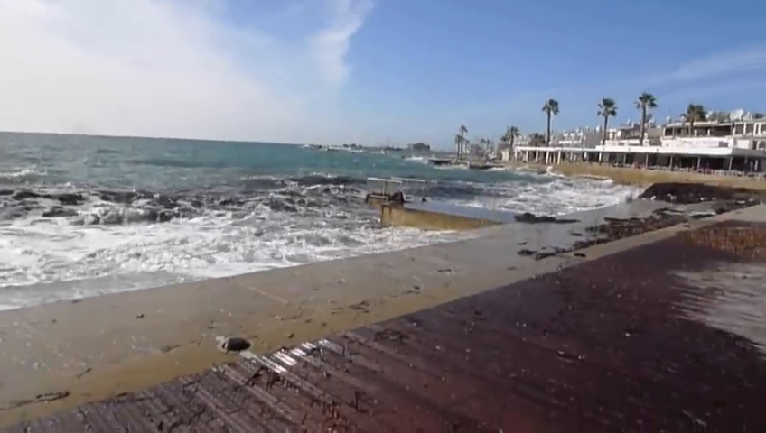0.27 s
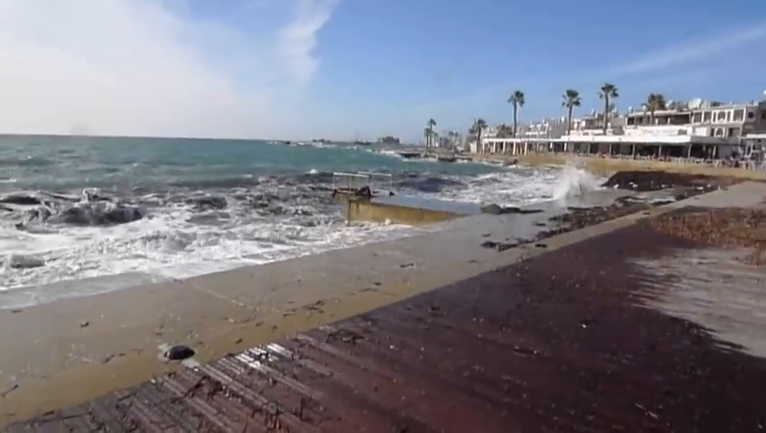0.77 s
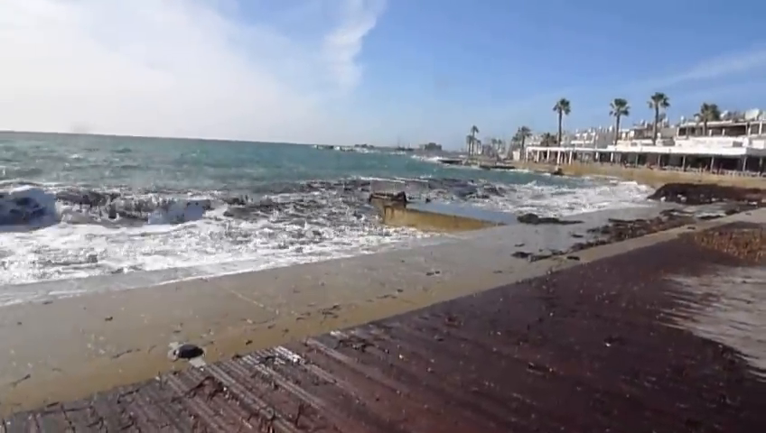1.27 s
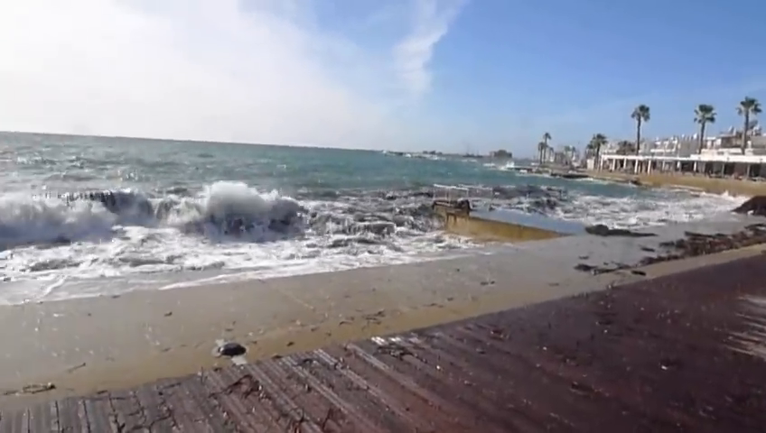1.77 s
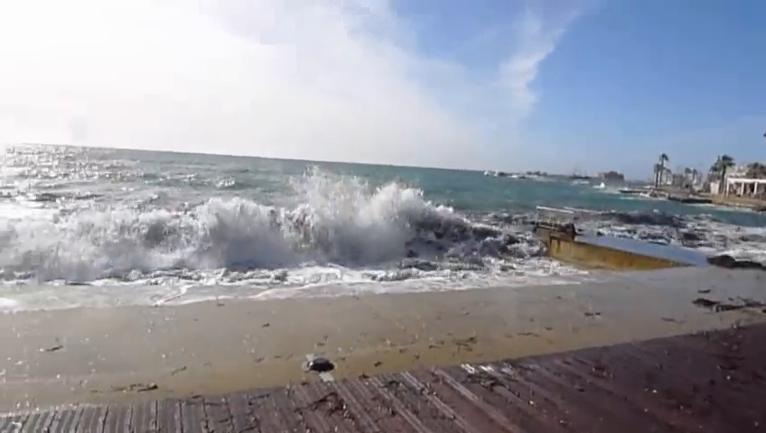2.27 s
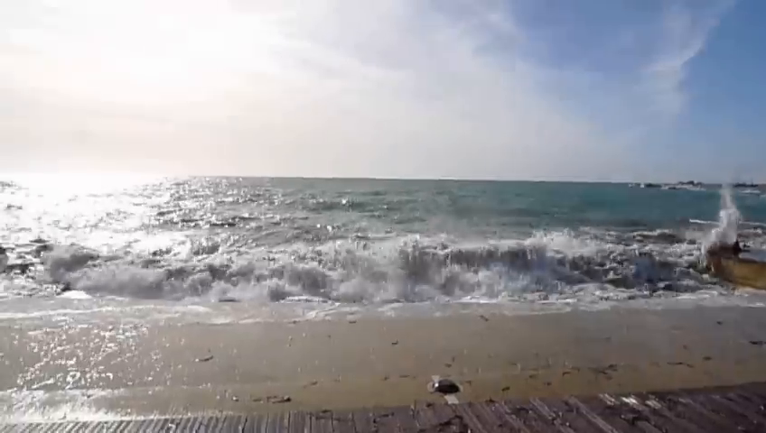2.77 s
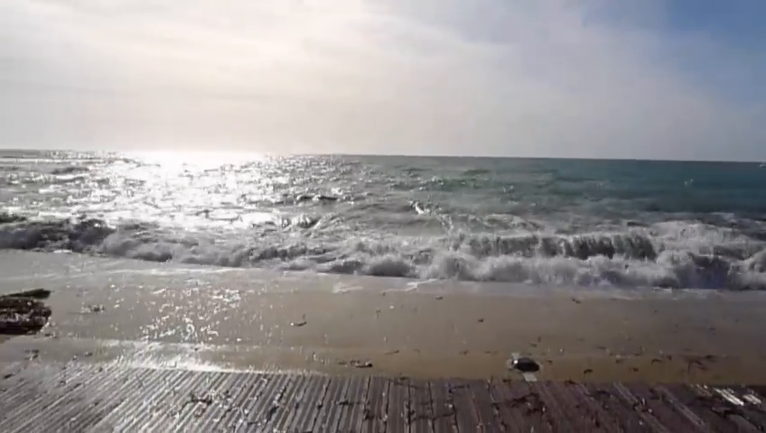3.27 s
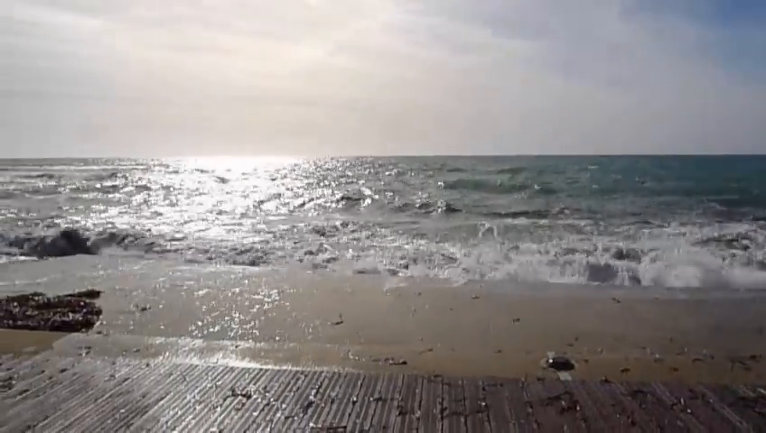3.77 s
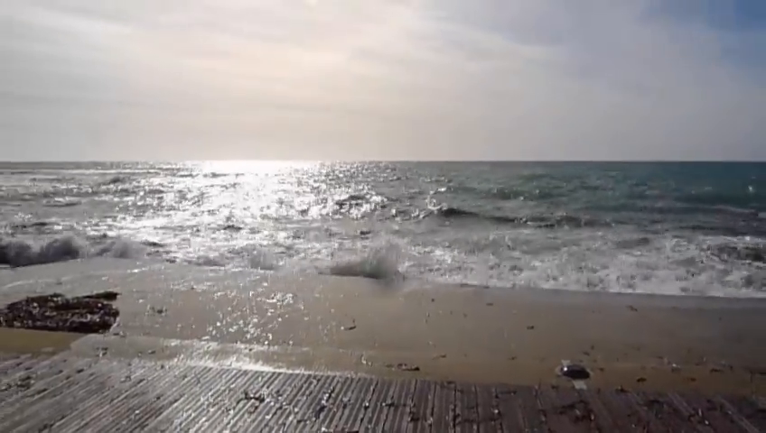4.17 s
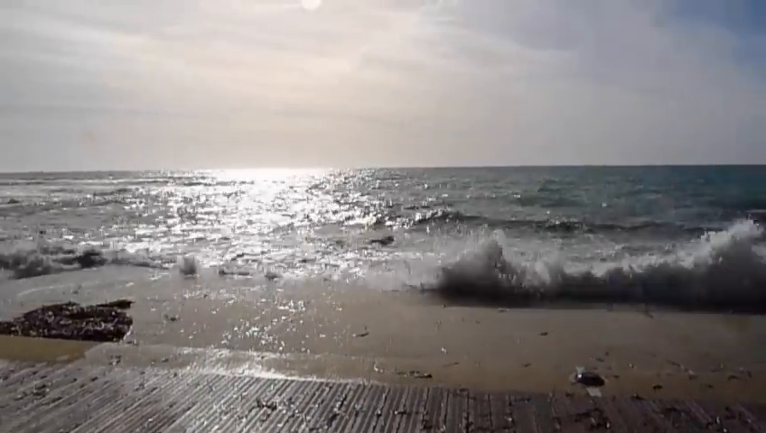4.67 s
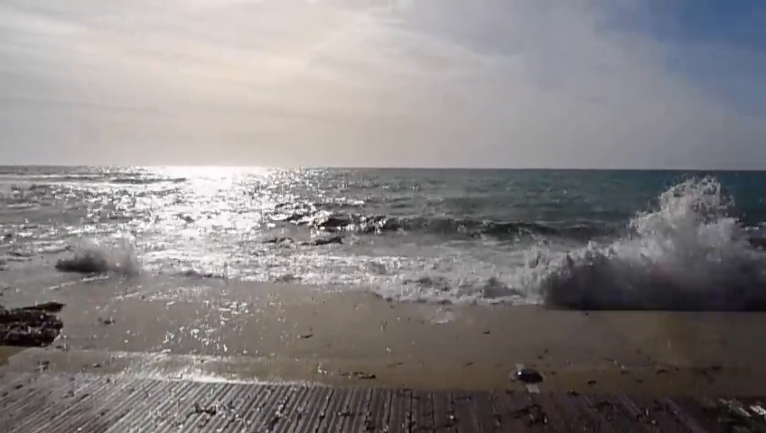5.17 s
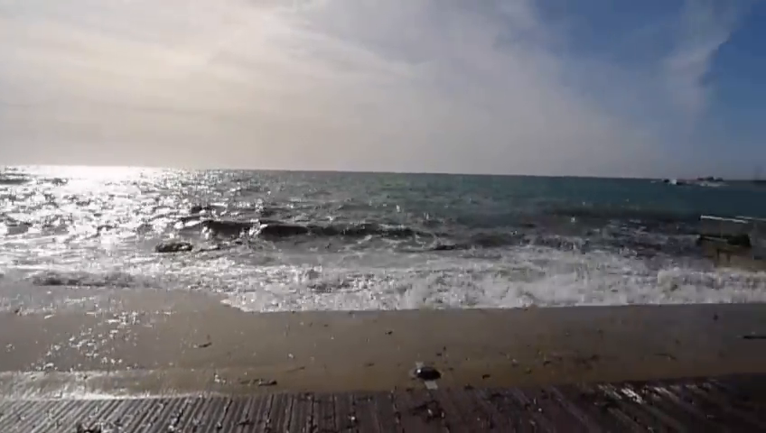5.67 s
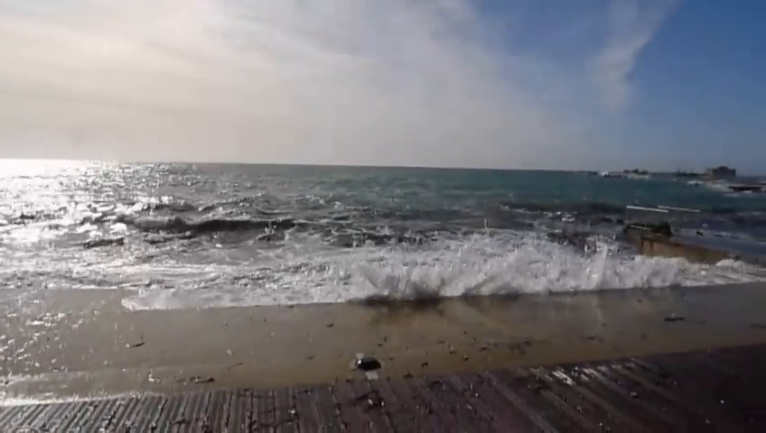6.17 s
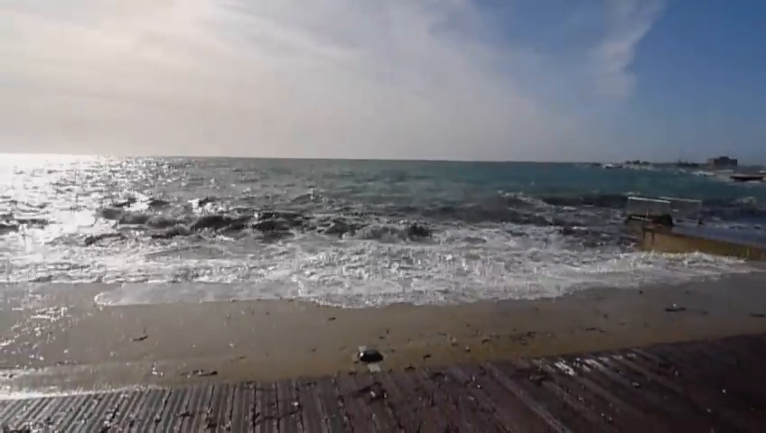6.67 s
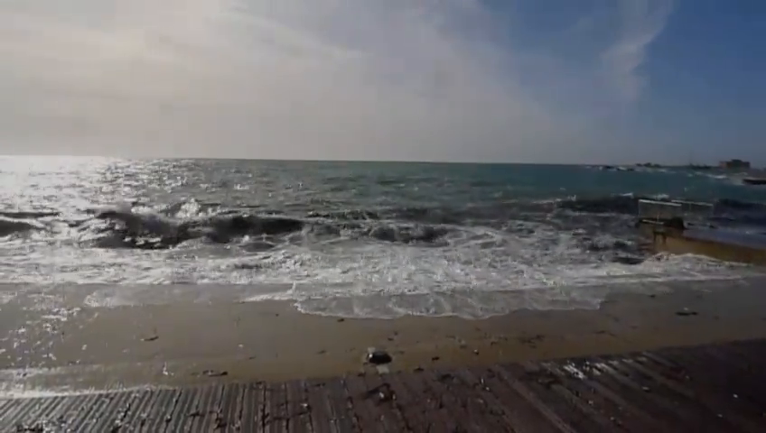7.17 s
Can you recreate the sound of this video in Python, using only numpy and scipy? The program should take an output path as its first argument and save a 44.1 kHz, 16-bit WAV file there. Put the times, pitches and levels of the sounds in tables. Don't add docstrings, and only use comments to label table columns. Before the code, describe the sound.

Gusty wind rumbles and thuds on a small camera microphone while rough sea foam hisses and breaks on wet concrete, later gurgling and popping.

```python
import sys
import numpy as np
from scipy import signal
from scipy.io import wavfile
from scipy.ndimage import uniform_filter1d

SR = 44100
rng = np.random.default_rng(int(sys.argv[2]) if len(sys.argv) > 2 else 0)


def put_to_file(sound):
    columns = np.atleast_2d(sound).T
    safe = np.clip(columns, -1, 1)
    whole_steps = np.round(safe * 32767)
    wavfile.write(sys.argv[1], SR, whole_steps.astype(np.int16))


def field_ratio(decibels):
    return 10 ** (np.asarray(decibels, dtype=float) / 20)


N = 327037
MIRROR_HZ = 765

# [t/s, peak/dB, f/Hz]
EARLY_SUCKS = [(0.018, -12, 137), (0.0615, -13, 208), (0.077, -12.9, 172), (0.1016, -10, 218),
               (0.1278, -8.5, 143), (0.169, -13, 232), (0.1933, -10.5, 183), (0.211, -9, 168),
               (0.236, -11, 242), (0.255, -23, 125), (0.2693, -7.5, 180), (0.5106, -8.5, 174),
               (0.6135, -11, 177), (0.626, -7, 128), (0.6446, -19, 110), (0.6617, -10.5, 229),
               (0.7563, -17, 113), (0.7684, -16, 110), (0.79, -11, 179), (0.8703, -15, 191),
               (0.887, -9.5, 183), (0.916, -10, 120), (0.9457, -7.5, 306), (1.0363, -9, 119),
               (1.073, -8, 160), (1.2529, -16, 165), (1.261, -5.5, 190), (1.2976, -21, 110),
               (1.306, -8, 158), (1.3346, -13, 202), (1.3668, -11, 180), (1.388, -9.5, 139),
               (1.5362, -11, 217), (1.5452, -17, 262), (1.6464, -12, 234), (1.665, -14, 306),
               (1.676, -4, 272), (1.694, -11, 400), (1.707, -14, 123), (1.7313, -10, 159),
               (1.806, -10.5, 234), (1.8357, -6.5, 276), (1.851, -8.5, 382), (1.9005, -9, 182),
               (1.92, -7, 290), (1.9333, -7.5, 350), (1.955, -20, 110), (1.9988, -16, 147),
               (2.018, -11.5, 198), (2.0399, -5, 226), (2.1, -10, 163), (2.108, -11, 190),
               (2.1238, -7, 286), (2.1681, -8, 236), (2.2263, -10.5, 328), (2.247, -11, 204),
               (2.2585, -9, 256), (2.275, -11, 204)]
# [t/s, peak/dB, f/Hz]
LATE_SUCKS = [(2.318, -9.5, 276), (2.3352, -8, 252), (2.389, -8.5, 188), (2.416, -12, 185),
              (2.445, -10.5, 265), (2.4635, -14.0, 279), (2.4766, -7, 232), (2.511, -12.5, 285),
              (2.5657, -10, 226), (2.593, -5.5, 200), (3.2177, -10.5, 277), (3.2552, -10, 201),
              (3.3104, -14.5, 284), (3.3253, -9.5, 183), (3.4231, -13, 235), (3.5251, -9, 170),
              (3.5415, -11, 272), (3.5513, -8.5, 282), (3.5632, -13, 334), (3.575, -16, 142),
              (3.6116, -9, 260), (3.64, -10, 244), (3.6991, -11.5, 250), (3.7597, -12.5, 148),
              (3.7727, -4.5, 280), (3.7945, -12, 237), (3.8142, -11, 212), (3.8369, -6, 256),
              (3.875, -11, 206), (4.2539, -10, 283), (4.3314, -10.5, 329), (4.3701, -13, 229),
              (4.4252, -10, 222), (4.4473, -16, 268), (4.4901, -13, 420), (4.501, -22, 136),
              (4.509, -14, 154), (4.5285, -8.5, 282), (4.5515, -12, 254), (4.615, -11, 316),
              (4.708, -16, 329), (4.9988, -13, 344), (5.0177, -17, 259), (5.0375, -17, 324),
              (5.271, -15, 270), (5.2883, -10, 229), (5.8911, -14, 242), (6.0256, -16, 175),
              (6.3203, -13, 264), (6.335, -17, 390), (6.367, -14, 265), (6.4288, -19, 290),
              (6.6836, -12.5, 206), (6.8157, -9, 151), (6.8248, -13, 149), (6.8342, -10, 176),
              (6.8422, -9.5, 133), (7.1143, -18.5, 147)]
# [t/s, peak/dB, f/Hz]
SMALL_SUCKS = [(0.0544, -16, 239), (0.3577, -17, 200), (.8367, -11, 119), (0.9396, -14, 400),
               (1.2583, -14, 210), (1.4777, -12, 170), (1.5112, -15, 220), (1.749, -16, 241),
               (1.9716, -13, 201), (2.148, -18, 220), (2.373, -15, 230), (2.645, -15, 400),
               (2.686, -16, 240), (3.1382, -17, 230), (3.3765, -14, 220), (3.438, -12, 230),
               (3.8826, -23, 300), (3.9024, -16, 330), (4.1299, -17, 300), (4.4648, -13, 230),
               (4.575, -16, 250), (4.914, -17, 238), (5.2539, -15, 242), (6.7755, -15, 221),
               (6.8518, -15, 150), (6.8916, -18, 220), (7.0961, -14.5, 200), (7.2345, -23, 327),
               (7.283, -16, 240), (7.3443, -15.5, 260)]
# [t/s, peak/dB, f/Hz]
STRONG_PUSHES = [(.079, -17, 201), (.463, -15, 200), (0.581, -13, 170), (1.22, -13.5, 170),
                 (1.681, -10.5, 400), (1.690, -11, 398), (1.711, -9.5, 262), (1.88, -15, 260),
                 (1.896, -11, 340), (2.08, -15, 298), (2.191, -11, 220), (2.237, -15, 217),
                 (2.402, -16, 300), (2.504, -16, 273), (3.341, -13, 220), (3.512, -14, 280),
                 (3.622, -8, 226), (4.198, -13, 330), (4.869, -12.5, 192)]
# [t/s, peak/dB, f/Hz]
MORE_PUSHES = [(0.0525, -20, 272.0), (0.1885, -12, 187.0), (0.2495, -14, 186.0), (0.2585, -11.5, 191.0),
               (0.5543, -17, 191.0), (0.7167, -12, 169.0), (0.7248, -14.0, 147), (0.7339, -10.5, 211.0),
               (0.881, -12.5, 110.0), (0.9347, -16, 232), (1.135, -14, 250.0), (1.292, -14, 186.0),
               (1.3018, -5.5, 204.0), (1.426, -11.5, 141.0), (1.4737, -18, 172.0), (1.6567, -15, 170.0),
               (1.6726, -8, 307.0), (1.995, -16, 140.0), (2.2054, -15, 195.0), (2.254, -10, 225),
               (2.3978, -9, 172), (2.4562, -14.0, 193.0), (2.4645, -11, 202.0), (3.2452, -11.5, 220.0),
               (3.3915, -19, 186.0), (3.403, -11, 260.0), (4.2422, -18, 218), (4.3269, -13, 187),
               (4.3935, -12, 218.0), (4.4743, -14, 213.0), (4.5003, -10, 206.0), (4.5471, -21, 142),
               (4.726, -12, 247.0), (4.8086, -13, 250.0), (5.0095, -11, 293.0), (5.04, -22, 247.0),
               (5.0703, -15, 208.0), (5.2748, -13, 213.0), (5.3186, -13, 220.0), (5.7939, -12, 210),
               (5.9926, -14, 231.0)]
# [t/s, level/dB, upper-middle hiss from facing the sea/dB, fineness of foam/dB]
SURF_COURSE = [(0.0, -36.5, -10.5, 0), (0.31, -33.5, -12.5, -1), (0.76, -29.5, -11.5, -0.5),
               (0.93, -28.5, -14.5, -2.5), (1.0, -34, -10, -0.5), (1.3, -30, -14, -1),
               (1.67, -29, -14.5, -2), (1.73, -34.5, -11.5, -1), (2.13, -34.5, -14.5, 1.5),
               (2.35, -30, -15, 0), (2.73, -36, -7.5, 2.5), (3.24, -28.5, -8.5, 0), (3.9, -32.5, -7.5, -.5),
               (4.27, -28, -8.5, -0.5), (5.14, -27.5, -5.5, 2), (5.9, -30.5, -10, -0.4), (6.45, -28, -7, 1),
               (7.17, -32, -10, 0)]
# [t/s, extra level/dB, length/s, extra weight of water/dB]
SLAB_HITS = [(0.91, -19, 0.027, -2), (1.54, -16, 0.038, 2), (1.662, -7, 0.024, 0), (3.25, -22, 0.041, 0.5),
             (3.316, -2, 0.012, -11), (3.538, -9.5, 0.054, -0.5), (4.24, -23, 0.014, 3),
             (5.275, -14, 0.0081, 2), (5.605, -36, 0.049, 1), (6.352, -7.5, 0.035, 2.5),
             (1.6, -17, .08, -2.5), (3.28, -21, .09, -2), (6.43, -17, 0.21, -1), (4.85, -14, 0.017, -5),
             (6.22, -16, 0.0205, -3), (6.744, -19, 0.079, 2), (7.38, -8, 0.088, -1.5)]


def evened(x):
    return x / np.sqrt(np.mean(x ** 2) + 1e-20)


def column(rows, t, count):
    rows = np.asarray(rows, float)
    return np.interp(t, rows[:, 0], rows[:, count])


def drift(shape, size):
    z = rng.standard_normal(shape)
    for axis, n in enumerate(size):
        z = uniform_filter1d(uniform_filter1d(z, n, axis), n, axis)
    return evened(z)


def noise(field_db, size):
    a, b = np.moveaxis(rng.standard_normal(field_db.shape + (2,)), -1, 0)
    spectrum = (a + 1j * b) * field_ratio(field_db)
    return signal.istft(spectrum.T, nperseg=size, noverlap=size * 3 // 4)[1][:N]


def grid(size):
    frame_s = np.arange(4 * N // size + 6)[:, None] * size / 4 / SR
    return frame_s, np.fft.rfftfreq(size, 1 / SR)[None]


def colour(points, hz):
    f, db = np.transpose(points)
    return np.interp(np.log(hz + 1), np.log(f + 1), db, left=-120, right=-120)


def eddy(hz, cycles):
    u = np.arange(1500) / SR * hz
    vent = signal.butter(2, 0.38 * hz, "high", fs=SR)
    pulse = signal.lfilter(*vent, np.sin(2 * np.pi * u) * u * np.exp(-u / cycles))
    return pulse / abs(pulse).max()


def thumps(cycles=0.35, db=0.5, higher=1.037):
    # [t/s, peak/dB, f/Hz]
    last_sucks = [
        (7.4028, -28, 230),
        (7.408, -16.5, 251),
        (7.4152, -18, 217),
    ]
    sucks = EARLY_SUCKS + LATE_SUCKS + SMALL_SUCKS + last_sucks
    out = np.zeros(N + 1500)
    for gain, rows in ((0.91, sucks), (-0.94, STRONG_PUSHES + MORE_PUSHES)):
        for s, peak_db, hz in rows:
            pulse = eddy(higher * hz, cycles)
            start = round(s * SR) - pulse.argmin()
            out[start:][:1500] += gain * field_ratio(peak_db + db) * pulse
    return out[:N]


def buffet(level, pitch, per_s, db, spread_db=2.0, clump_db=1.0, cycles=0.59, scatter=.28, suction=.75):
    t, out = np.arange(N) / SR, np.zeros(N)
    pitches = np.geomspace(80, 700, num=16)
    which = np.searchsorted(pitches, pitch * np.exp(scatter * rng.standard_normal(N)))
    knots = N // 100 + 2
    clumps = np.interp(t, np.arange(knots) * 100 / SR, drift((knots,), size=(9,)))
    size = field_ratio(spread_db * np.minimum(rng.exponential(1, N), 3) + clump_db * clumps)
    size = size * (rng.random(N) < per_s / SR)
    size = size * np.where(rng.random(N) < suction, 1, -1)
    for k, hz in enumerate(pitches):
        out += signal.oaconvolve(size * (which == k), eddy(hz, cycles))[:N]
    return out / np.sqrt(uniform_filter1d(out ** 2, size=3000) + 1e-9) * field_ratio(level + db)


def lull(depth=0.88, width_s=0.0053):
    t = np.arange(N) / SR
    strong = EARLY_SUCKS + LATE_SUCKS + STRONG_PUSHES + MORE_PUSHES + SMALL_SUCKS
    near_s = np.min(abs(t[::64, None] - np.transpose(strong)[0]), axis=1)
    return 1 - depth * np.exp(-(np.interp(t, t[::64], near_s) / width_s) ** 2)


def rumble(level, lumpy_db=4.0, lean=0.4):
    # [f/Hz, density/dB per Hz]
    rumble_spectrum = [(15, -36.5), (30, -23.5), (50, -4.5), (66, 2), (82, 1), (110, -3.5), (160, -8.5),
                       (260, -24.5)]
    # [t/s, level/dB, length/s]
    leans = [(0.108, -3, 0.023), (0.208, -3, 0.031), (0.374, -5, 0.03), (0.831, 6, 0.066),
             (0.996, -3, 0.088), (1.072, -5, 0.014), (1.285, 0, 0.08), (1.366, -1, 0.044),
             (1.492, 2, 0.042), (1.682, 2, 0.08), (1.805, -4.5, 0.08), (2.105, 0, 0.08), (2.196, -2, 0.027),
             (2.31, -15, 0.073), (2.393, 11, 0.09), (2.563, -10, 0.064), (2.782, 0, 0.036),
             (2.92, 3, 0.045), (3.004, -2, 0.025), (3.076, -2, 0.037), (3.205, -3, 0.023),
             (3.273, 10, 0.08), (3.472, -1, 0.078), (3.617, 3, 0.08), (3.688, -2, 0.034), (3.763, 3, 0.054),
             (3.949, -3, 0.021), (4.044, -6, 0.087), (4.216, -3, 0.035), (4.353, 6, 0.08),
             (4.551, -1, 0.037), (5.154, -8, 0.08), (5.335, -3, 0.023), (5.4, 1, 0.045), (5.483, -7, 0.08),
             (5.703, 6, 0.072), (5.824, -6, 0.036), (6.039, -6, 0.03), (6.352, -3, 0.032),
             (6.538, -6, 0.08), (6.725, -6, 0.032), (6.823, 12, 0.067), (6.92, -2, 0.01),
             (7.032, -3, 0.063), (7.282, 0, 0.061)]
    t, hz = grid(size=2048)
    lumps = lumpy_db * drift((len(t), 1), size=(2,))
    raw = noise(colour(rumble_spectrum, hz) + lumps, size=2048)
    power = uniform_filter1d(uniform_filter1d(raw ** 2, size=2400), size=2400)
    steady = raw / np.sqrt(power + 1e-12)
    s, heave_db, length = np.transpose(leans)[:, :, None]
    u = np.arange(0, N, 64) / SR
    bumps = (heave_db * np.exp(-((u - s) / length) ** 2)).sum(0)
    heave = np.interp(np.arange(N) / SR, u, bumps)
    return steady * field_ratio(level + lean * heave)


def air(t):
    # [t/s, strength/dB, weight of large slow gusts/dB, share of small quick eddies/dB]
    wind_course = [(0.0, -21.5, -8, -4), (0.35, -27.5, -2, -6.5), (0.75, -23.5, 2, -3.5),
                   (1.2, -27.5, 3, -2.5), (1.6, -28.5, 3.5, -1.5), (1.8, -19, -6.5, -3.5),
                   (2.45, -22.5, -8, -7.5), (2.65, -29, -10.5, -8), (3.0, -29.5, -14.5, -5),
                   (3.3, -24.5, -13, -5.5), (3.8, -20, -12.5, -10), (3.97, -29, -14.5, -6),
                   (4.45, -23, -14.5, -7), (5.0, -27, -12.5, 0), (5.5, -27.5, -20, -6),
                   (6.2, -28, -8.5, -3), (6.7, -28, -8.5, -3), (7.42, -35, -4, -2)]
    # [t/s, level/dB, length/s, extra weight/dB]
    gust_bumps = [(.09, -2.5, 0.067, 0), (0.245, 5, 0.047, -1.5), (0.395, 2.5, 0.046, 4.5),
                  (.5, 1, 0.054, 4.5), (0.623, 2, 0.034, 0.5), (0.93, 3, 0.023, 2), (0.988, -10, 0.036, 7),
                  (1.047, 3, 0.018, -5), (1.273, 4, .04, -2.5), (1.695, 11.5, 0.052, -8.5),
                  (1.77, -8.5, 0.025, 6), (2.025, 2, 0.026, -4.5), (2.064, -5, 0.022, -2),
                  (2.137, 5, 0.036, -4.5), (2.247, 7, 0.024, 5), (2.58, -3, 0.017, 2), (3.31, -1, 0.02, 3),
                  (3.468, -1, 0.033, -0.5), (3.56, 8, 0.032, -1.5), (3.68, -4.5, 0.023, -0.5),
                  (3.798, 2, 0.05, -0.5), (3.917, 1.5, .05, -3), (4.133, 3.5, 0.045, -5.5),
                  (2.85, -2, 0.07, -3.5), (5.2, -0.5, 0.044, 2), (5.93, 1, .04, -1.5),
                  (6.154, -0.5, 0.05, -2.5), (6.56, -4, .05, -2.5), (4.52, 4, .05, 2), (4.748, 2, 0.028, 1),
                  (5.01, 7.5, 0.041, 4), (5.27, 8, 0.022, 0), (5.72, 2.5, 0.056, 4), (6.01, 5, 0.036, 0),
                  (6.37, -3, 0.054, 2), (6.646, -1, 0.069, 7), (6.829, 9.5, 0.028, 0.5),
                  (7.113, 8, 0.04, 1)]
    s, db, length, extra = np.transpose(gust_bumps)[:, :, None]
    bumps = np.exp(-((t - s) / length) ** 2)
    steady = column(wind_course, t, count=1)
    gust, heavy = (db * bumps).sum(0), (extra * bumps).sum(0)
    small = steady + column(wind_course, t, count=3) + 0.56 * gust - 0.064 * heavy
    return steady + gust, column(wind_course, t, count=2) + heavy, small


def wind():
    t = np.arange(N) / SR
    strength, weight, quick = (np.interp(t, t[::64], v) for v in air(t[::64]))
    large_hz = 195.45 * 2 ** (-0.02 * (weight + 5))
    large = buffet(strength, large_hz, per_s=400, db=-0.5)
    small = buffet(quick, 400., per_s=460, db=-3.5, cycles=0.71, scatter=.18)
    return (large + small) * lull() + rumble(strength + weight) * lull(depth=0.45) + thumps()


def slaps(t):
    hits = sum(field_ratio(db) * np.exp(-((t - s) / length) ** 2) for s, db, length, _ in SLAB_HITS)
    return 20 * np.log10(1 + hits)


def surf(crest=0.24, mirror=0.22, patchy_db=0.5, flicker_db=0.5, low_follow=0.44):
    # [f/Hz, density/dB per Hz]
    foam_spectrum = [(30, -32), (70, -25.5), (110, -13), (200, -2), (350, -3), (570, -13), (800, -9),
                     (1100, -11), (1800, -15), (2800, -17), (3500, -21), (3850, -31), (4200, -35.5),
                     (4700, -42.5), (5600, -49)]
    t, hz = grid(size=512)
    level, facing, bright = (column(SURF_COURSE, t, count=k) for k in (1, 2, 3))
    body = 0.45 * (facing + 6.5) - 0.16 * bright
    body = body + sum(db * np.exp(-((t - s) / length) ** 2) for s, _, length, db in SLAB_HITS)
    echo = mirror / (1 + (hz / 3500) ** 8) * np.exp(-2j * np.pi * hz / MIRROR_HZ)
    shape = colour(foam_spectrum, hz) + 20 * np.log10(abs(1 + echo))
    band = (hz[0] > 650) & (hz[0] < 1800)
    shape = shape - 10 * np.log10(np.sum(field_ratio(shape[0, band]) ** 2))
    upper = np.clip((hz - 2300) / 600, 0, 1) * (bright + 0.24)
    middle = np.exp(-((hz - 2330) / 380) ** 2) * (facing + 6.06)
    middle = middle + np.exp(-((hz - 830) / 280) ** 2) * (body + 0.13)
    swing = level - level.mean() + slaps(t)
    follow = low_follow + (1 - low_follow) * np.clip(hz / 600, 0, 1)
    follow = follow + crest * np.clip((hz - 3600) / 800, 0, 1)
    field = shape + upper + middle + level.mean() + follow * swing
    field = field + patchy_db * drift((len(t), hz.size), size=(14, 4))
    field = field + flicker_db * drift((len(t), 1), size=(5,))
    return field_ratio(2.0) * noise(field, size=512)


def spray(per_s=1500, spread_db=1.5, db=-10):
    out, t = np.zeros(N), np.arange(N) / SR
    which = rng.integers(0, 14, N)
    size = field_ratio(spread_db * np.minimum(rng.exponential(1, N), 4))
    size = size * (rng.random(N) < per_s / SR)
    for k, hz in enumerate(np.geomspace(600, 3300, num=14)):
        u = np.arange(400) / SR * hz
        pop = np.sin(2 * np.pi * u * (1 + 0.028 * u)) * u * np.exp(-u / 1.1)
        out += signal.oaconvolve(size * (which == k), pop)[:N]
    out = out + 0.38 * np.roll(out, round(SR / MIRROR_HZ))
    swell = column(SURF_COURSE, t, count=1) + np.interp(t, t[::64], slaps(t[::64]))
    return evened(out) * field_ratio(swell + db)


def gulps(cycles=3.42, glide=0.0091, db=-1.0):
    # [t/s, level/dB, f/Hz]
    folds = [(3.322, -23, 910), (3.553, -27, 750), (4.238, -29, 830), (4.546, -17.5, 860),
             (4.895, -19, 807), (4.995, -15, 710), (5.082, -18, 830), (5.156, -31, 685), (5.263, -19, 818),
             (5.285, -16, 829), (5.582, -17.5, 850), (6.3, -24, 950), (6.318, -22, 900), (6.331, -22, 860),
             (6.342, -21, 930), (6.357, -20, 2250), (6.36, -25, 3050), (6.3546, -13, 880),
             (6.368, -19, 875), (6.428, -16, 904), (6.448, -18, 1460), (6.486, -15.5, 880),
             (6.482, -19, 1500), (6.566, -18, 1604), (7.288, -25, 796), (7.338, -23, 880)]
    out = np.zeros(N)
    for s, level_db, hz in folds:
        u = np.arange(1200) / SR * hz
        swell = u / cycles * np.exp(1 - u / cycles - (u / 9) ** 2)
        ring = np.sin(2 * np.pi * u * (1 - 3 * glide + glide * u)) * swell
        start = round((s - .8 * cycles / hz) * SR)
        out[start:][:1200] += field_ratio(level_db + db) * ring
    return out


def bubbles():
    # [t/s, level/dB, f/Hz, length/s, share of rise]
    pockets = [
        (7.263, -32, 2215, .04, .27),
        (7.285, -33, 1275, .095, .02),
        (7.25, -33, 1500, .035, .02),
        (7.39, -31, 1310, .02, .02),
        (7.32, -35, 2200, .022, .15),
    ]
    out = np.zeros(N)
    for s, db, hz, length, rise in pockets:
        t = np.arange(round(length * SR)) / SR
        pitch = hz * (1 - rise * np.exp(-5.5 * t / length))
        pitch = pitch * (1 + 0.015 * drift((len(t),), size=(150,)))
        ring = np.sin(2 * np.pi * np.cumsum(pitch) / SR) * np.hanning(len(t))
        out[round(s * SR):][:len(t)] += field_ratio(db) * ring
    return out


def scene():
    return (surf() + spray() + gulps() + wind() + bubbles())[None]


def low_pass(x):
    return signal.sosfilt(signal.butter(12, 15700, fs=SR, output="sos"), x)


def record(dry):
    # [f/Hz, level/dB]
    whines = [(4388, -76), (6222.2, -85), (6666.6, -85), (7584, -89)]
    t = np.arange(N) / SR
    thinned = signal.sosfilt(signal.butter(2, 55, "high", fs=SR, output="sos"), dry)
    top = np.where(thinned > 0, .45, .62)
    limited = top * np.tanh(thinned / top)
    held = signal.sosfilt(signal.butter(4, 4300, fs=SR, output="sos"), limited)
    own = field_ratio(-59) * rng.standard_normal(N)
    own = own + sum(field_ratio(db + 1.5) * np.sin(2 * np.pi * hz * t) for hz, db in whines)
    gentle = signal.firwin(151, 7950, window=("kaiser", 8), fs=SR)
    steep = signal.firwin(601, 8260, window=("kaiser", 8), fs=SR)
    edge = np.convolve(gentle, steep)
    padded = np.pad(held + own, ((0, 0), (400, 400)), "edge")
    banded = signal.oaconvolve(padded, edge[None], "same")[:, 400:-400]
    mix = banded - .0077
    return low_pass(mix)


dry = scene()
out = record(dry)
put_to_file(out)
```